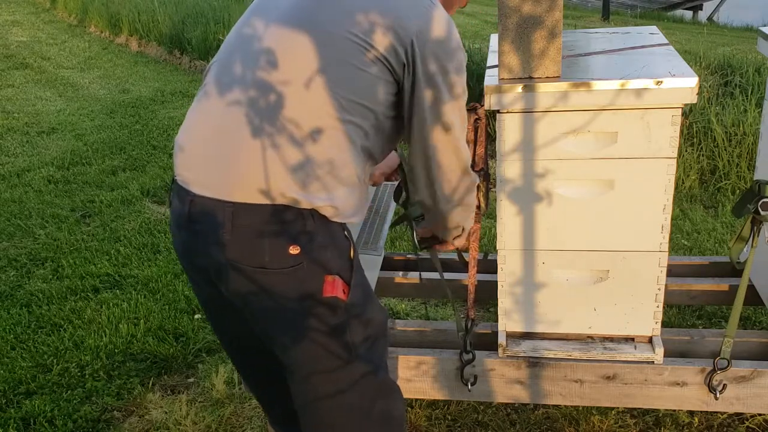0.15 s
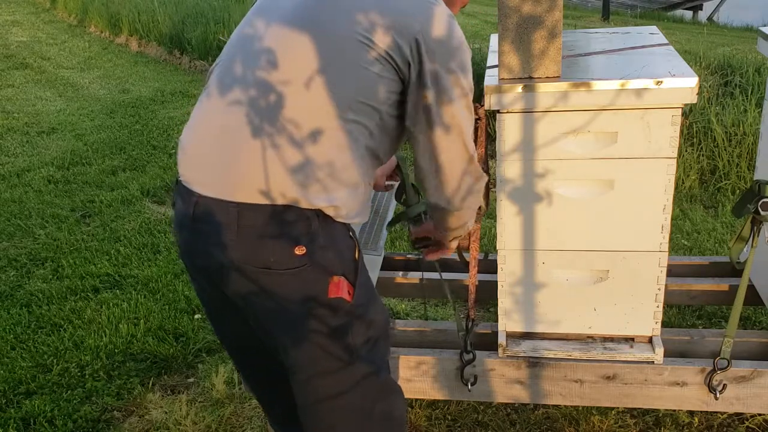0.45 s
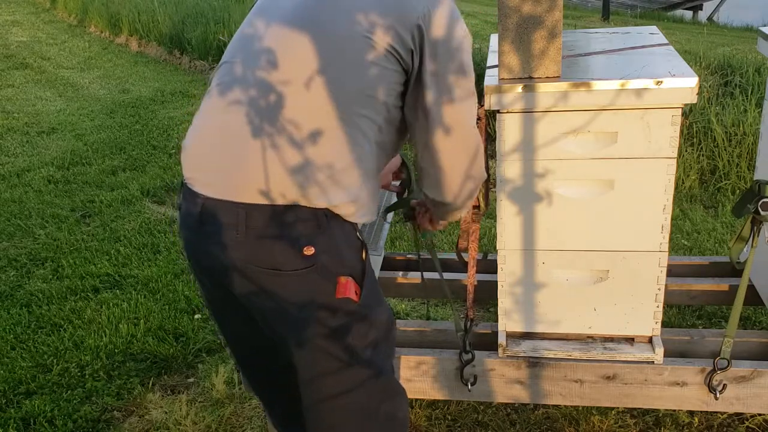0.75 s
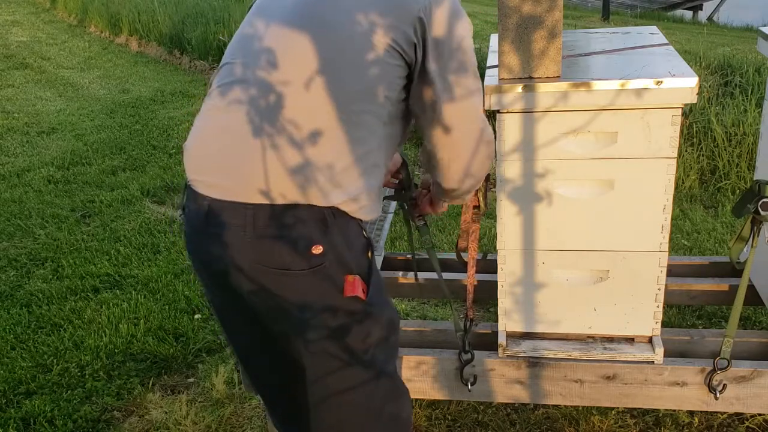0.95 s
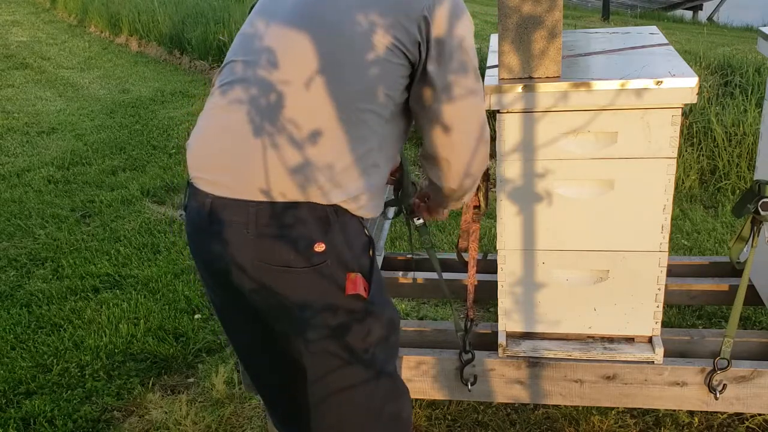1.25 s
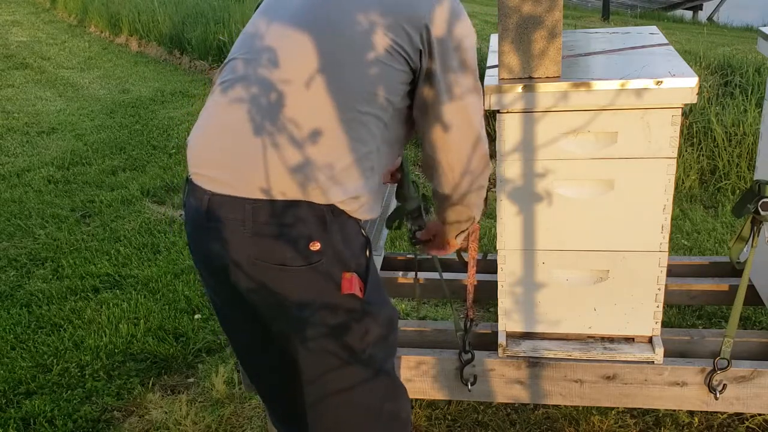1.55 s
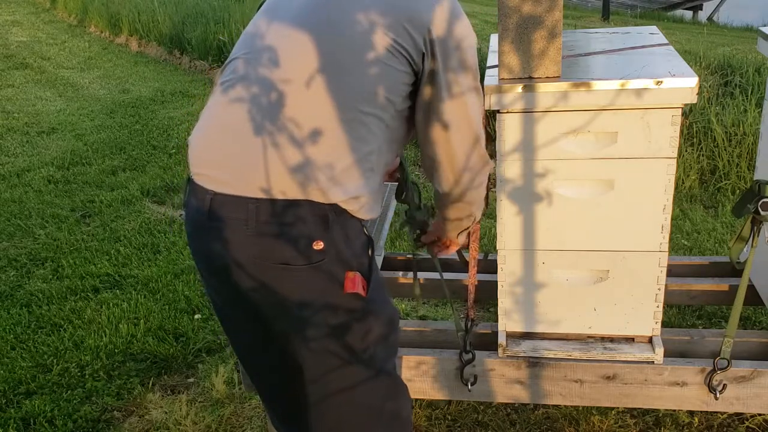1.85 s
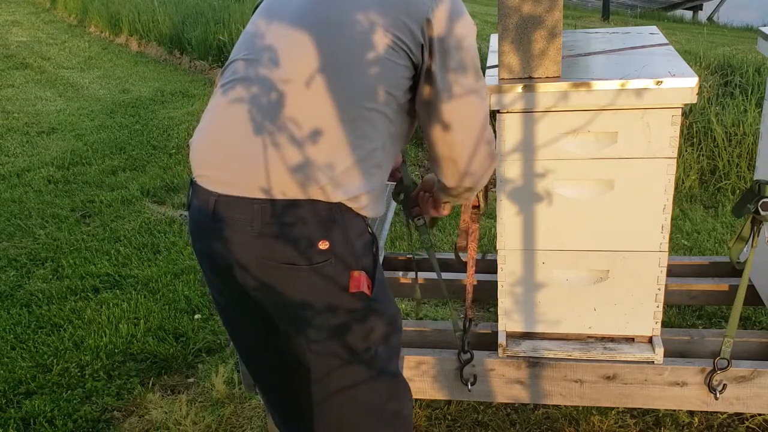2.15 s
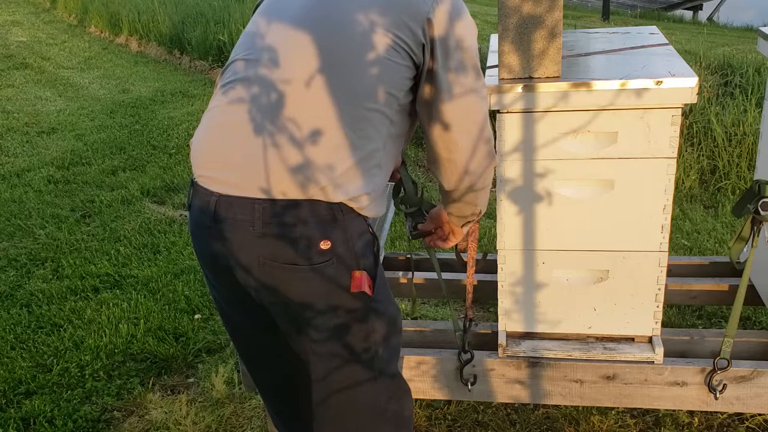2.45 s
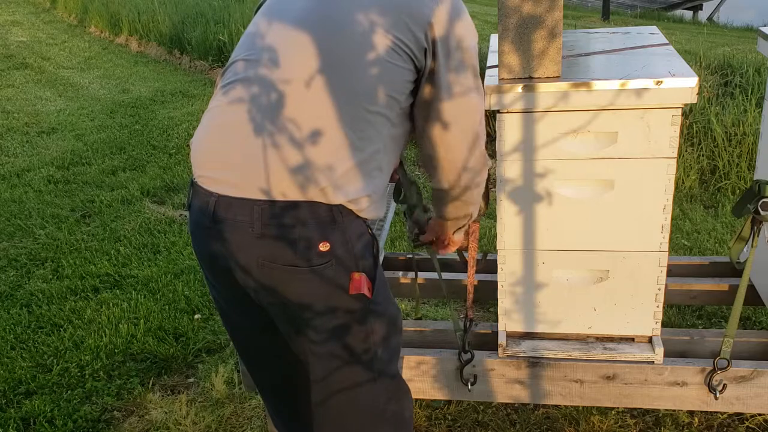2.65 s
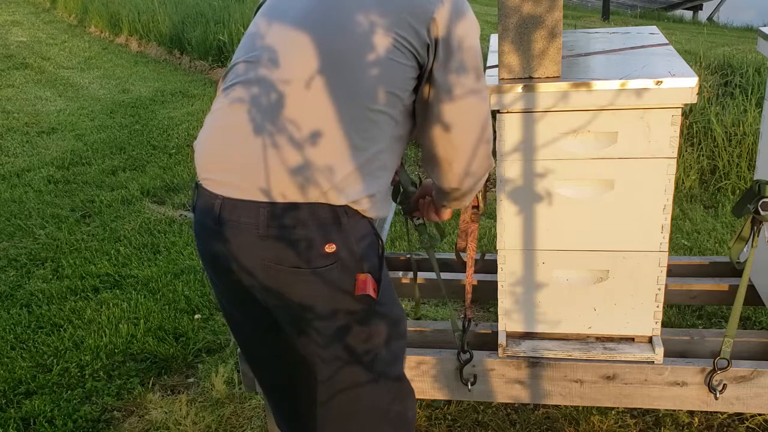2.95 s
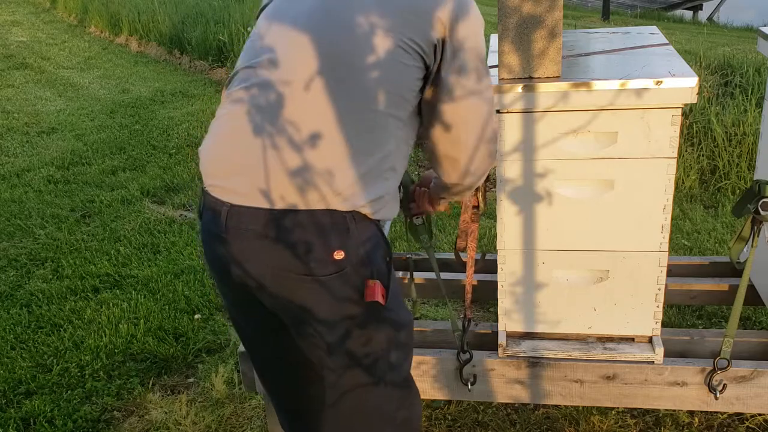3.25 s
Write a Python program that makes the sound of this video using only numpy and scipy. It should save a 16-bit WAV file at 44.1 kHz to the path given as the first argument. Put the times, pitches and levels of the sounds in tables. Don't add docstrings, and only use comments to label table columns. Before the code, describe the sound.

A steel ratchet tightens a strap around wooden hive boxes, two metres away outdoors. Light ticks at 0.6 s lead to dry pivot squeaks around 0.9 and a hard snap at 1.04. More sharp snaps come at 1.6, 2.2 and 2.54, with scrapes, low hollow thuds and groaning wood; smaller clacks cluster from 2.8 to 3.15. Faint birds whistle over low rumble and slight hiss.

```python
import sys
import numpy as np
from scipy import signal
from scipy.fft import rfft, irfft
from scipy.io import wavfile
from scipy.ndimage import uniform_filter1d

SR = 44100
rng = np.random.default_rng(int(sys.argv[2]) if len(sys.argv) > 2 else 0)


def to_linear_factor(level_db):
    exponent = np.asarray(level_db, float) / 20
    return 10 ** exponent


def bounce(signal):
    frames = np.transpose(np.atleast_2d(signal))
    limited = np.clip(frames, -1, 1)
    pcm = np.round(limited * 32767).astype(np.int16)
    wavfile.write(sys.argv[1], SR, pcm)


N = 149940

# pitch_hz [Hz], level_db [dB]
STEEL_HIGH = [(4000, -28), (5500, -17.5), (8000, -14.5), (10900, -4), (12500, -8.5), (15000, -4),
              (16500, -7.5)]
STEEL_MID = [(600, -22.5), (1300, -15), (2200, -4.5), (4300, -1.5), (7000, -17.5)]


def colour(x, points):
    hz, db = np.array(points, float).T
    size = x.shape[-1]
    bin_hz = np.arange(size // 2 + 1) * SR / size + 1e-3
    gain_db = np.interp(np.log(bin_hz), np.log(hz), db, left=-90)
    y = irfft(rfft(x) * to_linear_factor(gain_db), size)
    return y / y.std()


def walk(rate_hz, size=N):
    hold = max(int(SR / rate_hz), 1)
    steps = np.repeat(rng.standard_normal(size // hold + 2), hold)
    return 1.3 * uniform_filter1d(uniform_filter1d(steps, hold), hold)[:size]


def fade(t, t60_s):
    return np.exp(-np.log(1000) * t / t60_s)


def hump(size, edge, release):
    u = np.arange(size) / size
    ramp = np.minimum(u / edge, (1 - u) / release)
    return np.sin(np.pi / 2 * np.clip(ramp, 0, 1)) ** 2


def add(out, x, start_s):
    i = int(start_s * SR)
    out[i:i + len(x)] += x[:N - i]


def ring(x, modes):
    t = np.arange(SR // 2) / SR
    body = sum(to_linear_factor(db) * fade(t, t60_s) * np.sin(2 * np.pi * hz * t) for hz, db, t60_s in modes)
    return signal.fftconvolve(x, body)[:N]


def whistles(table, harmonics_db, jitter, rate_hz, flutter_db, edge):
    out = np.zeros(N)
    for start_s, length_s, first_hz, last_hz, level_db in table:
        size = min(int(length_s * SR), 9000)
        waver = walk(rate_hz, 9000)[:size]
        flutter = walk(rate_hz / 2, 9000)[:size]
        hz = np.linspace(first_hz, last_hz, size) * (1 + jitter * waver)
        phase = 2 * np.pi * np.cumsum(hz) / SR
        tone = np.zeros(size)
        for k, harmonic_db in enumerate(harmonics_db, 1):
            audible = hz * k < .45 * SR
            tone += to_linear_factor(harmonic_db) * audible * np.sin(k * phase)
        add(out, to_linear_factor(level_db + flutter_db * flutter) * hump(size, edge, 2 * edge) * tone, start_s)
    return out


def field():
    # pitch_hz [Hz], level_db [dB]
    air_points = [(30, -22.5), (55, 0.5), (110, 0), (200, -12.5), (500, -35.5), (900, -45), (2800, -41),
                  (6000, -55.5)]
    field_db = -53
    mid = colour(rng.standard_normal(N), air_points) * to_linear_factor(field_db + 1.5 * walk(4))
    side = colour(rng.standard_normal(N), air_points) * to_linear_factor(field_db - 10)
    hiss_points = [(5000, -24), (8500, -14), (11000, -2), (16000, 0)]
    hiss = colour(rng.standard_normal((2, N)), hiss_points) * to_linear_factor(-81)
    return mid + side * np.array([[1], [-1]]) + hiss


def songbirds():
    # start_s [s], length_s [s], first_hz
    # [Hz], last_hz [Hz], level_db [dB]
    bird_notes = [(0, 0.055, 3250, 3100, -70), (.06, .05, 3300, 3123, -69), (.34, 0.092, 2300, 2480, -74),
                  (.37, 0.046, 2600, 3050, -72.5), (.41, 0.052, 3100, 2440, -64.5),
                  (.455, 0.043, 2100, 2310, -68), (.53, .035, 2450, 2360, -64),
                  (.56, 0.054, 2130, 2085, -65.5), (.64, 0.074, 3150, 2360, -73.5),
                  (.76, 0.1, 2320, 2160, -66.5), (.96, .05, 3500, 3276, -63.5),
                  (1.51, 0.07, 3000, 2200, -68), (1.63, 0.045, 2500, 2080, -65),
                  (1.795, 0.044, 2750, 2965, -66), (1.865, .04, 3000, 3490, -74.5),
                  (1.91, 0.034, 3250, 2700, -62.5), (1.985, 0.009, 3150, 3280, -55.5),
                  (2.04, 0.078, 2450, 2260, -76.5),
                  (2.338, 0.11, 3290, 2807, -64.5),
        (2.618, 0.061, 3006, 2195, -67),
        (2.72, 0.073, 2770, 2100, -74),
        (2.755, 0.072, 3380, 3350, -68),
        (3.009, .12, 3050, 2586, -68),
        (3.09, 0.2, 3360, 3370, -67.5),
        (3.241, .16, 2347, 2520, -74.5),
    ]
    return whistles(bird_notes, [0], jitter=.014, rate_hz=100, flutter_db=3, edge=0.14)


def boxes():
    # start_s [s], frame_db [dB], wall_db [dB], lid_db [dB]
    thuds = [(0.765, -25, -38, -52), (1.052, -19.5, -25.5, -39.5), (1.474, -41, -24.5, -35),
             (1.514, -14, -24.5, -35), (1.615, -17.5, -22.5, -31.5), (1.727, -43, -27.5, -52),
             (2.115, -32, -27, -33.5), (2.192, -61, -24, -23.5), (2.445, -33, -30, -30.5),
             (2.533, -13, -23.5, -28), (2.842, -58, -37, -36.5), (2.926, -50, -30.5, -22),
             (2.955, -29.5, -32.5, -29), (2.989, -47.5, -44.5, -35), (3.156, -60, -59, -38.5)]
    # time_s [s], level_db [dB]
    strain = [(0, -84.5), (.62, -67.5), (.92, -48.5), (1.0, -58.5), (1.55, -56.5), (1.95, -66),
              (2.14, -52.5), (2.28, -53.5), (2.8, -63.5), (2.93, -56.5), (3.4, -66)]
    # pitch_hz [Hz], level_db [dB], t60_s [s]
    frame = [(72.7, -1, .12), (113.5, -9.5, 0.11)]
    wall = [(196.2, 7, 0.082), (270, -17.5, 0.017)]
    lid = [(393.5, -0.5, .05), (445.7, -2.5, 0.097), (524, -17, 0.013), (707, -6, 0.021), (1080, -8, 0.01)]
    load = to_linear_factor(np.interp(np.arange(N) / SR, *np.array(strain).T) + 3.53 * walk(24.82))
    push_s, shake_t60_s = 0.0069, 0.14
    t = np.arange(8192) / SR
    shake = np.minimum(t / push_s, 1) ** 2 * fade(t, shake_t60_s)
    out = np.zeros(N)
    # resonances, groan dB, push dB
    parts = [(frame, 5.5, -34), (wall, 0, -32), (lid, -20, -30)]
    for column, (modes, groan_db, push_db) in enumerate(parts, 1):
        push = np.zeros(N)
        for row in thuds:
            rough = shake * rng.standard_normal(len(t))
            add(push, to_linear_factor(row[column] + push_db) * rough, row[0] - push_s / 2)
        groan = ring(rng.standard_normal(N), modes)
        out += ring(push, modes) + to_linear_factor(groan_db) * load * groan / groan.std()
    return out


def pivot_squeaks():
    # start_s [s], length_s [s], first_hz [Hz], last_hz [Hz], level_db [dB]
    squeaks = [
        (.732, .03, 3680, 3620, -50),
        (.867, 0.031, 3970, 3990, -51),
        (.892, .02, 3980, 4120, -40),
        (.911, .022, 4100, 4230, -41),
        (.926, .095, 4230, 4150, -57),
        (1.022, .013, 4270, 4260, -42.5),
    ]
    chirps = [
        (2.104, .018, 4100, 3940, -42.5),
        (1.277, .02, 4900, 4200, -53),
        (.798, .012, 4750, 4700, -66),
        (.842, 0.024, 3700, 4000, -62),
    ]
    jitter = .016
    motion = dict(rate_hz=1500, flutter_db=6.5, edge=.18)
    squeal = whistles(squeaks, [1.5, -4.5, 0, -18], jitter, **motion)
    return squeal + whistles(chirps, [0, -18], 2 * jitter, **motion)


def steel_noise(mid_db, grit_db):
    grains = rng.standard_normal(8192) * to_linear_factor(grit_db * rng.exponential(1, 8192))
    grip = to_linear_factor(3.5 * walk(SR / 70, 4097))
    grains = irfft(rfft(grains) * grip)
    return colour(grains, STEEL_HIGH) + to_linear_factor(mid_db) * colour(grains, STEEL_MID)


def handle_scrapes():
    # start_s [s], length_s [s], level_db [dB], low_mid_share_db [dB]
    slides = [(0.595, 0.082, -63, -2.5), (0.892, .035, -49.5, -17), (1.274, .062, -56, -1.5),
              (1.462, 0.095, -63.5, -2.5), (1.602, 0.0073, -41, -2), (1.92, 0.035, -31, -22.5),
              (1.948, 0.055, -57, -1.5), (2.118, 0.11, -69.5, 11), (2.348, 0.1, -68.5, 3),
              (2.803, 0.031, -40, -7.5), (2.91, 0.091, -59, 6.5), (3.368, 0.034, -69.5, 2),
              (2.543, 0.0097, -62, -3), (1.033, 0.025, -32.5, -5), (2.192, 0.012, -27, -34)]
    out = np.zeros(N)
    for start_s, length_s, level_db, mid_db in slides:
        size = min(int(1.25 * length_s * SR), 8192)
        catch_db = 4.5 * walk(200, 8192)[:size]
        envelope = to_linear_factor(level_db + catch_db) * hump(size, 0.055, 0.61)
        add(out, envelope * steel_noise(mid_db, 3.5)[:size], start_s)
    return out


def pawl_clicks():
    # start_s [s], peak_db [dB], low_mid_share_db [dB]
    snaps = [(1.0325, -27.5, -27), (1.0363, -7, -25.5), (1.6123, -9.5, -16), (2.1929, -8.5, -21),
             (2.389, -32.5, -12), (2.4436, -28.5, -6), (2.5279, -20, -12.5), (2.5409, -10, -14.5),
             (2.8452, -20.5, -26), (2.9315, -39, -16), (2.9566, -36, 3), (2.9939, -19.5, -12),
             (3.1506, -22, -51)]
    ticks = [
        (0.622, -37.5, -10),
        (0.6587, -47, -24),
        (1.3042, -44.5, -1),
        (1.4671, -50.5, 0.5),
        (1.505, -46, 6),
        (2.1228, -33.5, -3),
        (2.1508, -39, 6),
        (2.427, -54.5, 14),
        (2.8085, -35.5, -3.5),
        (2.9673, -42.5, 11.5),
    ]
    crack_s, rattle_db = 0.00046, -10
    t = np.arange(8192) / SR
    crack = (t / crack_s) * np.exp(1 - t / crack_s)
    onset = np.minimum(t / crack_s, 1)
    out = np.zeros(N)
    for contacts, t60_s in [(snaps, .07), (ticks, 0.033)]:
        for start_s, peak_db, mid_db in contacts:
            rattle = to_linear_factor(rattle_db + 3 * walk(300, len(t))) * fade(t, t60_s) * onset
            add(out, to_linear_factor(peak_db - 4.5) * (crack + rattle) * steel_noise(mid_db, 1.5), start_s)
    return out


def space(x, level_db, t60_s, low_cut_hz):
    t = np.arange(int(.6 * SR)) / SR
    low_cut = signal.butter(2, low_cut_hz, "high", fs=SR)
    tail = signal.lfilter(*low_cut, rng.standard_normal((2, len(t)))) * fade(t, t60_s)
    tail /= np.sqrt((tail ** 2).sum(1, keepdims=True))
    return to_linear_factor(level_db) * signal.fftconvolve(x[None], tail, axes=1)[:, :N]


def scatter(x, level_db, t60_s):
    tail = fade(np.arange(int(.6 * SR)) / SR, t60_s) ** 2
    energy = np.abs(signal.fftconvolve(x ** 2, tail / tail.sum())[:N])
    noise = rng.standard_normal((2, N))
    steel = colour(noise, STEEL_HIGH) + to_linear_factor(-8.5) * colour(noise, STEEL_MID)
    return to_linear_factor(level_db) * np.sqrt(energy) * steel


def place_ratchet(near):
    left_lag_s, pan_db = 1.5e-5, -2
    hz = np.arange(N // 2 + 1) * SR / N
    late = irfft(rfft(near) * np.exp(-2j * np.pi * hz * left_lag_s), N)
    return np.array([late * to_linear_factor(pan_db / 2), near * to_linear_factor(-pan_db / 2)])


def scene():
    birds = songbirds()
    wood = boxes()
    squeal = pivot_squeaks()
    hits = pawl_clicks() + handle_scrapes()
    mix = field()
    mix = mix + birds * to_linear_factor(np.array([[1.5], [-1.5]])) + space(birds, 2, .2, 500)
    mix = mix + wood + space(wood, -10, 0.037, 450)
    mix = mix + place_ratchet(hits + squeal)
    mix = mix + scatter(squeal, -10, .15) + space(squeal, 0.5, 0.027, 900)
    return mix + scatter(hits, -8, 0.041) + scatter(hits, -20, 0.31)


def roll_off(x):
    return signal.sosfilt(signal.butter(12, 17150, fs=SR, output="sos"), x)


def record(dry):
    low_cut = signal.butter(4, 48, "high", fs=SR, output="sos")
    steep_top = signal.ellip(8, .3, 70, 15670, fs=SR, output="sos")
    x = signal.sosfilt(low_cut, dry)
    x = signal.sosfilt(steep_top, x)
    return roll_off(x)


dry = scene()
out = record(dry)
bounce(out)
```